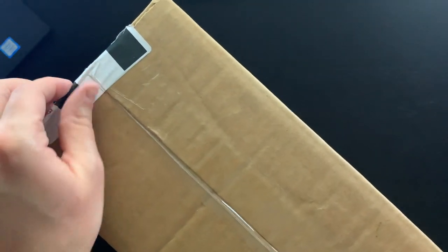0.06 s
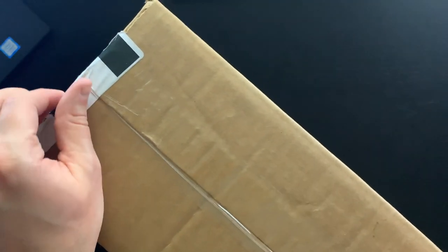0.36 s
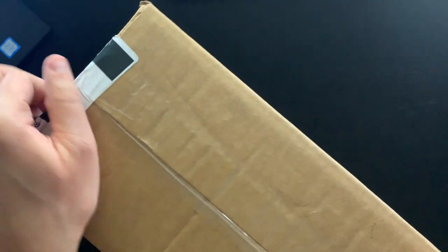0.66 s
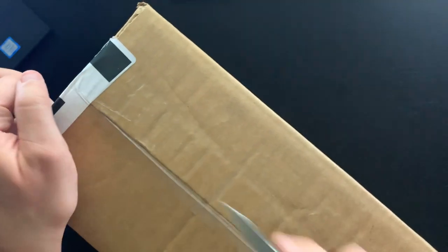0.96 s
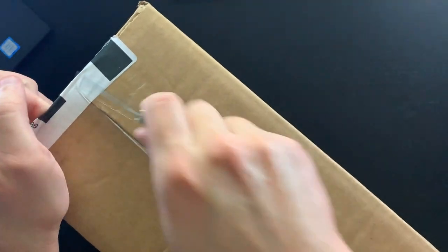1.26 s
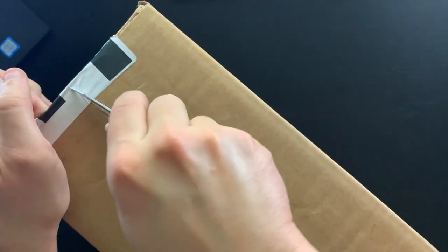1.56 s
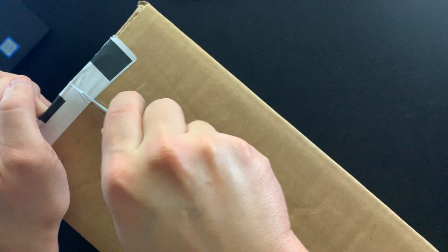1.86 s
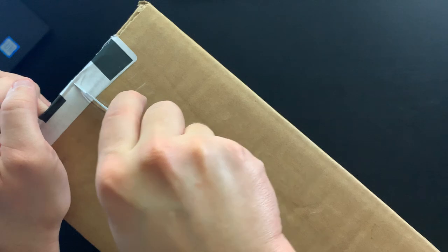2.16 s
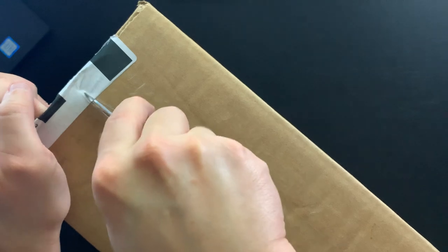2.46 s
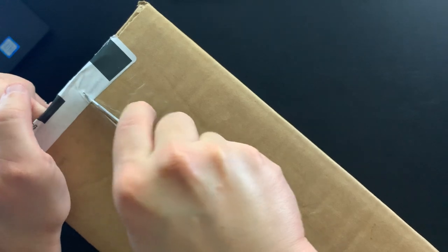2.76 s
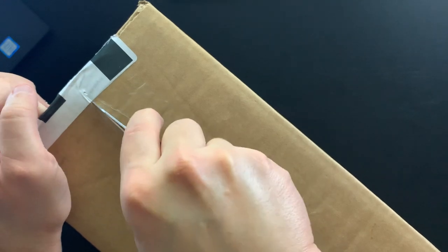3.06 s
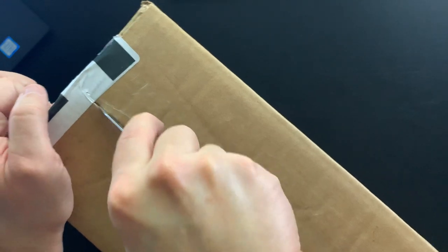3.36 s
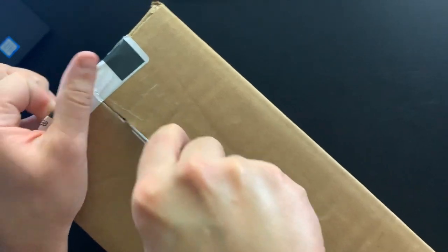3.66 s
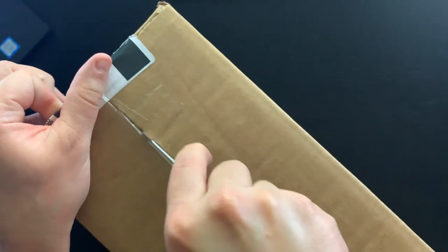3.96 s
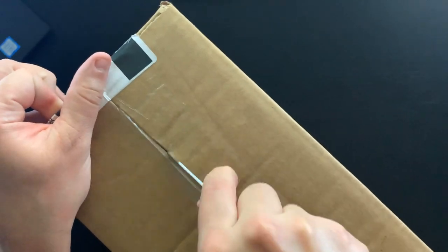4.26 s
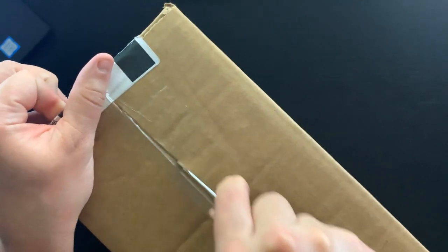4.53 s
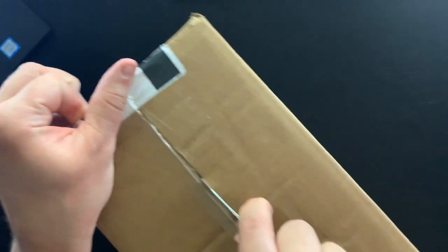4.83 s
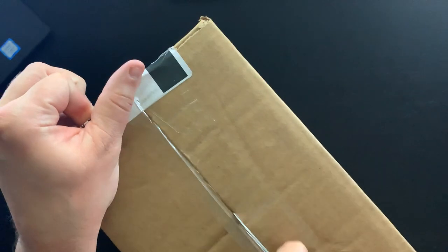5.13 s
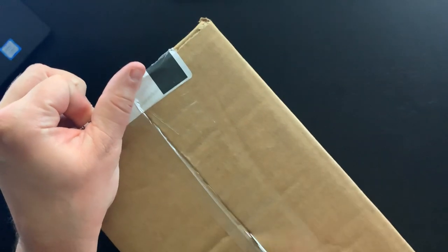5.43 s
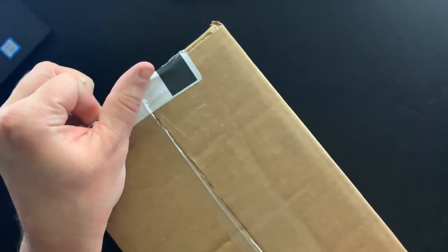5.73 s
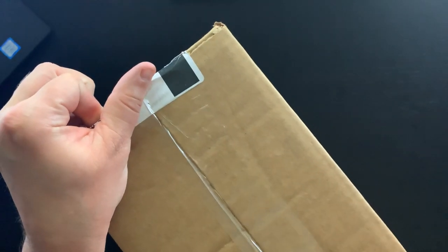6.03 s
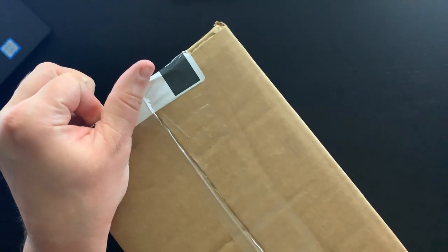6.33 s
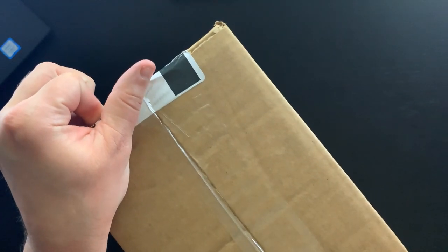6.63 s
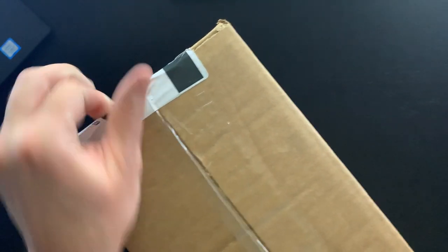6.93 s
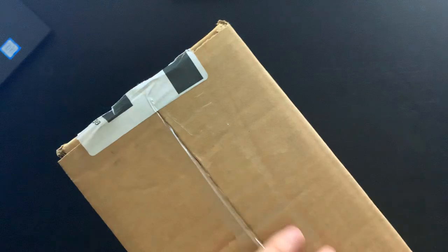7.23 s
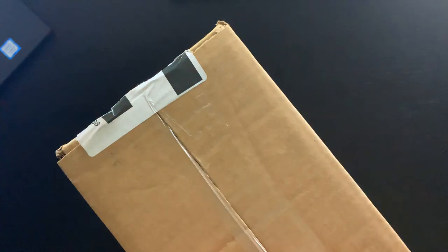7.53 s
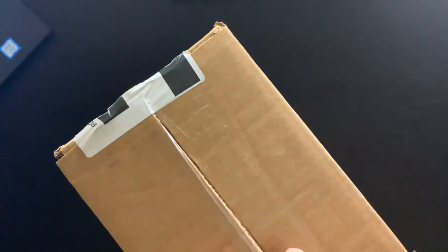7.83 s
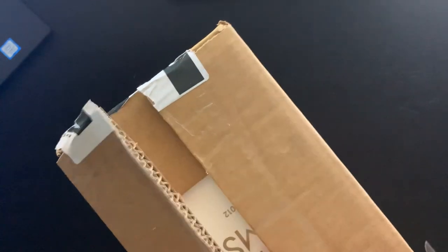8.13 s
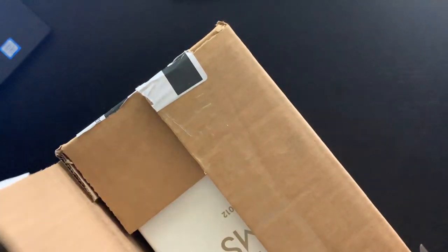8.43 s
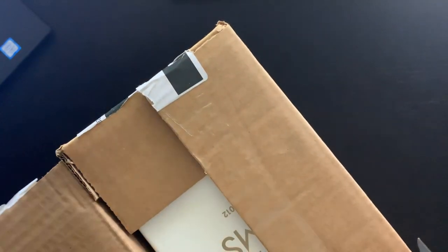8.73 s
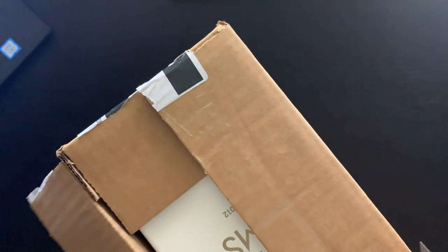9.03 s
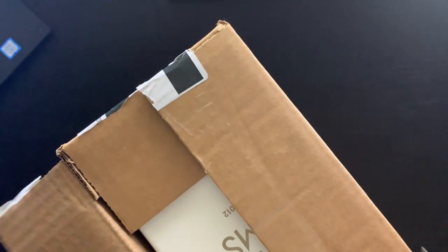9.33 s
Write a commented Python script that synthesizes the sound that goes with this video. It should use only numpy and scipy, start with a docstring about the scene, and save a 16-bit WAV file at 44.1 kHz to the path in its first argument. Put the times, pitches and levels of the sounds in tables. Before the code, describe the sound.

Hands shift a cardboard box with soft rubs and taps while a knife picks at the packing tape. The blade then slits the seam in a run of rasping, hissing strokes, catching with small pops. After a sharp knock, the last tape crackles and gives with a loud snap, and a flap rubs open with a faint creak. It is all heard close up in a small, quiet room.

```python
"""Opening a taped cardboard box

Close up, on a table in a small room. Hands shift the box; a knife picks at the packing tape, slits the
seam in several strokes and is laid down. The last tape crackles and snaps; a flap swings open, rubbing
on its fold. Rubbing is grainy noise through board resonances, cracks and knocks are noise bursts over
box modes, jolted panels are damped sines. Air rumbles on the microphone."""
import sys
import numpy as np
from scipy import signal
from scipy.fft import rfft, irfft
from scipy.io import wavfile

SR = 44100
rng = np.random.default_rng(int(sys.argv[2]) if len(sys.argv) > 2 else 0)


def dump_mix(stems):
    """Bounce the given channels to the path in sys.argv[1] as a 16-bit WAV at rate SR."""
    frames = np.atleast_2d(stems).T  # one column per channel
    limited = np.clip(frames, -1, 1)  # hard clip at full scale
    pcm = np.round(limited * 32767).astype(np.int16)
    wavfile.write(sys.argv[1], SR, pcm)


N = 414076
T = np.arange(N) / SR

# lid resonances under hand and blade: f/Hz, width/Hz, gain/dB
LID_RESONANCES = [(111, 17, -5), (178.5, 25, 6), (300, 31, 11), (494, 58, 9.5), (730, 300, 1.5),
                  (1960, 150, -10)]


def blade_strokes(drum_db=-6, drum_db_per_s=1.5):
    """Rows for rub(); drumming grows from the stiff corner towards the middle of the lid."""
    # start/s, end/s, rasp/dB, hiss re rasp/dB
    cuts = [(3.098, 3.207, -43, -10), (3.246, 3.376, -45, -13), (3.415, 3.419, -49, -12),
            (3.515, 3.606, -35.5, -9), (3.676, 3.944, -40.5, -11.5), (4.016, 4.032, -52, 1),
            (4.097, 4.166, -33.5, -7), (4.237, 4.26, -41, -5), (4.327, 4.442, -41.5, -7.5),
            (4.481, 4.536, -36, -4.5), (4.602, 4.818, -39.5, -5.5), (4.816, 5.152, -38, -7.5),
            (5.199, 5.281, -43, -9), (5.287, 5.443, -38, -7), (5.471, 5.56, -40, -5),
            (5.555, 5.992, -36, -4.5), (5.84, 6.378, -37.5, -2.5), (6.158, 6.588, -43.5, -1.5)]
    start, end, rasp, hiss = np.transpose(cuts)
    travel_s = (start + end) / 2 - start[0]
    return np.transpose([start, end, rasp, rasp + hiss, rasp + drum_db + drum_db_per_s * travel_s])


def blade():
    """The knife slits the tape along the seam."""
    # f/Hz, gain/dB
    spectrum = [(47, -25), (80, -3), (182, -5.5), (248, -15), (386, -8.5), (750, -11.5), (1170, -16),
                (1800, -8.5), (2430, -13.5), (3540, -11.5), (4140, -20), (4800, -14.5), (5640, -21),
                (9000, -21.5), (12500, -20), (16000, -32)]
    return rub(blade_strokes(), spectrum, LID_RESONANCES,
               grains_per_s=450, grain_db=-1, judder_db=1.3, snag_db=-5, singing=True)


def blade_jumps(cycles=1.94, ring_db=-19, chip_db=-15, chip_t60_s=0.027, size=6000):
    """The blade catches and jumps free: a short push, a chip of torn fibre, hand-damped ringing."""
    # t/s, level/dB, push f/Hz
    catches = [(3.085, -31, 900), (3.232, -28, 800), (3.576, -13.5, 1010), (4.954, -13, 657),
               (4.984, -15, 700), (5.018, -20, 380), (5.066, -11, 630), (5.4, -19, 506),
               (5.955, -20.5, 332), (6.082, -27, 298), (6.125, -25, 380)]
    out, t = np.zeros(N), np.arange(size) / SR
    for s, db, hz in catches:
        push = np.sin(2 * np.pi * hz * t) * fade(t, cycles / hz)
        chip = unit(band(rng.standard_normal(size), hz, 6000, order=1)) * fade(t, chip_t60_s)
        add(out, s, undb(db) * (push / push.max() + undb(ring_db) * box_ring(t) + undb(chip_db) * chip))
    return out


def tape_cracks(thud_db=-16):
    """Tape cracks as it is pierced, cut and pulled; the light film hardly moves the box."""
    # t/s, level/dB, snap re level/dB, film f/Hz
    breaks = [(.277, -36.5, -18, 4300), (0.333, -42.5, 5.5, 5500), (.459, -21.5, -8, 6000),
              (0.542, -37.5, 0.5, 4800), (.879, -41, -7, 5000), (1.053, -37, -11.5, 4970),
              (1.285, -38.5, -5.5, 4500), (2.427, -32.5, -0.5, 4480), (2.749, -59.5, -14, 6000),
              (3.593, -28.5, -9, 9000), (4.132, -22.5, -4, 9800), (4.526, -22.5, -12, 10000),
              (5.354, -36.5, 3, 11500), (5.803, -43.5, 12, 12500), (5.828, -36, 4, 12500),
              (5.879, -46, 10, 12000), (6.609, -22, -5.5, 13500), (6.671, -30.5, -1.5, 12500),
              (6.727, -47, 10, 14000), (7.311, -41, 1, 11000), (7.327, -27.5, 3, 9000),
              (7.332, -32.5, 2, 8800), (7.382, -33, -3.5, 10000), (7.497, -36, 4, 8500),
              (7.505, -28, 1, 7900), (7.511, -29.5, 6.5, 7900), (7.594, -27, 1.5, 6700),
              (7.642, -25.5, -4, 7550), (7.778, -48.5, 4, 13500), (7.822, -27, -3, 7100),
              (7.847, -37, 7.5, 11000), (7.856, -22.5, -1, 11000), (7.867, -19.5, -1.5, 9300),
              (7.952, -25, -8, 8000), (8.014, -18.5, -8, 4350), (8.084, -47.5, 8, 9500),
              (8.229, -43, 6.5, 10000), (8.522, -41, 6, 9950), (8.777, -56.5, 2.5, 9000),
              (8.834, -56.5, 7, 7000), (8.975, -44.5, 0, 10000), (9.0, -48, 2, 8000), (9.022, -51, 2, 8500),
              (9.085, -59, -3, 9000)]
    rows = [(s, db, thud_db, snap_db, hz) for s, db, snap_db, hz in breaks]
    return cracks(rows, hold_s=0.00094, crack_t60_s=0.017, snap_t60_s=0.015, strain_db=-20)


def knocks(snap_db=-8.5, snap_per_thud=-0.29, thud_trim_db=-0.5, film_hz=4860):
    """Knife and fingers knock on the board, the flap jumps free; the heavier the thud, the duller."""
    # t/s, level/dB, thud weight/dB
    blows = [(.649, -35, -4.5), (0.863, -41, 3), (.914, -32.5, -0.5), (0.945, -51, 17.5),
             (1.024, -41.5, -3), (1.276, -41.5, 10), (1.394, -43, 12), (1.517, -46, 3), (1.723, -40.5, 3),
             (1.858, -43.5, 10), (1.92, -52, 7), (2.043, -44, 2.5), (2.11, -44.5, 0), (2.392, -39, 6),
             (2.998, -52.5, 4), (3.084, -35.5, 5.5), (4.054, -45, 9.5), (6.582, -39.5, 7),
             (6.672, -41.5, 11), (6.729, -40, 4), (6.927, -17, -8), (6.936, -15.5, 1), (7.963, -9, 0.5),
             (7.971, -14.5, 2), (8.681, -49, 3)]
    rows = [(s, db, thud + thud_trim_db, snap_db + snap_per_thud * thud, film_hz)
            for s, db, thud in blows]
    return cracks(rows, hold_s=0, crack_t60_s=0.019, snap_t60_s=0.025, strain_db=-26.5)


def panel_booms(release_s=7.963, lag_cycles=1.44, rise_s=0.00046, size=12000):
    """Jolted panels and tape swing at their own pitch; the freed flap rings, its low modes last."""
    # t/s, level/dB, f/Hz, t60/cycles
    jolts = [(.459, -10, 1930, 19), (0.947, -26, 130, 3), (1.283, -26, 840, 9), (1.395, -25, 316, 11),
             (1.721, -33.5, 1095, 33), (1.858, -39, 318, 12), (3.576, -27, 114.4, 21),
             (3.578, -18.5, 312, 22), (4.132, -10.5, 315, 22), (4.669, -28.5, 304, 31),
             (6.609, -8.5, 670, 9), (6.928, -12, 742, 33), (6.928, -20, 2080, 25), (6.938, -21.5, 320, 31),
             (6.938, -22, 172, 17), (7.16, -29.5, 127, 5), (7.51, -28, 306, 17), (8.746, -39, 760, 8.5)]
    # f/Hz, level/dB, t60/s
    flap_modes = [(113.7, -12.5, 0.18), (149.4, -1, 0.052), (484, -8.5, 0.06), (559, -2, 0.045),
                  (786, -13, 0.056), (1120, -10, 0.04), (1436, 1.5, 0.011), (1834, -4, 0.023)]
    swings = [(s, db, hz, cycles / hz) for s, db, hz, cycles in jolts]
    swings += [(release_s + lag_cycles / hz, db, hz, t60_s) for hz, db, t60_s in flap_modes]
    out, t = np.zeros(N), np.arange(size) / SR
    attack = 1 - np.exp(-t / rise_s)
    for s, db, hz, t60_s in swings:
        add(out, s, undb(db) * np.sin(2 * np.pi * hz * t) * fade(t, t60_s) * attack)
    return out


def flap_strokes(drum_db=-6):
    """Rows for rub(); a lighter contact trades drumming for hiss."""
    # start/s, end/s, rasp/dB, lightness/dB
    slides = [(6.484, 6.796, -47, -3), (6.849, 6.915, -44, -4), (6.95, 7.105, -54.5, -11),
              (7.141, 7.27, -46, -1.5), (7.265, 7.44, -49, -6.5), (7.45, 7.786, -46.5, -4.5),
              (7.81, 7.957, -39, -2), (7.956, 8.1, -59, 0), (8.1, 8.218, -54.5, -2), (8.227, 8.427, -49, 8),
              (8.353, 8.652, -50, 3), (8.571, 9.105, -60, -2), (9.167, 9.459, -59, -2.5)]
    start, end, rasp, lightness = np.transpose(slides)
    return np.transpose([start, end, rasp, rasp + lightness, rasp + drum_db - lightness])


def flap():
    """Hands slide on the lid and the flap rubs on its fold."""
    # f/Hz, gain/dB
    spectrum = [(47, -38), (80, -15), (119, -9), (700, -13), (1170, -8.5), (3960, -14), (6500, -11.5),
                (11000, -5.5), (16000, -15.5)]
    # loose flap: f/Hz, width/Hz, gain/dB
    resonances = [(174, 30, 11), (486, 33, 13), (1150, 150, -5.5), (1840, 180, 6), (3250, 500, -1.5),
                  (4500, 450, -0.5)]
    return rub(flap_strokes(), spectrum, resonances,
               grains_per_s=500, grain_db=-6, judder_db=0.7, snag_db=-7)


def hand_strokes(hiss_db=-7.5):
    """Rows for rub(); the hiss of skin on board follows its rasp."""
    # start/s, end/s, rasp/dB, drumming/dB
    touches = [(0, 0.172, -56.5, -51), (0.17, 0.375, -52.5, -52), (0.426, 0.517, -49.5, -42.5),
               (0.523, 0.648, -48, -47.5), (0.7, 0.808, -49.5, -42.5), (0.796, 1.15, -64, -44),
               (1.32, 1.57, -63.5, -54), (2.118, 2.142, -48.5, -48), (2.252, 2.359, -53, -61),
               (2.389, 2.392, -40.5, -47), (2.41, 2.448, -50.5, -65), (2.646, 2.66, -59.5, -65)]
    start, end, rasp, drum = np.transpose(touches)
    return np.transpose([start, end, rasp, rasp + hiss_db, drum])


def hands():
    """Fingers rub the box and the knife tip probes the tape."""
    # f/Hz, gain/dB
    spectrum = [(47, -17), (109, 6.5), (174, 1), (212, 2), (296, -0.5), (718, -15.5), (1000, -16.5),
                (1900, -19), (3170, -21), (4900, -27.5), (13700, -32), (16000, -40)]
    return rub(hand_strokes(), spectrum, LID_RESONANCES,
               grains_per_s=500, grain_db=-5, judder_db=1.1, snag_db=-2, singing=True)


def rub(strokes, spectrum, resonances, grains_per_s, grain_db, judder_db, snag_db, singing=False):
    """Fibres catch and let go in dense clicks that the board colours; the contact judders."""
    start_s, end_s, rasp_db, hiss_db, drum_db = np.transpose(strokes)
    grains = (rng.random(N) < grains_per_s / SR) * rng.standard_normal(N)
    force = unit(undb(grain_db) * unit(grains) + rng.standard_normal(N))
    force *= undb(judder_db * (walk(45) + walk(220)))
    force *= 1 + undb(snag_db) * pulses(per_s=41, cap=2.5, t60_s=0.0039)  # snagged fibres
    # resonances wander about 2 % as the contact point moves
    ring = sum(undb(db) * resonate(force, hz * undb(0.16 * walk(4)), width_hz) / 2
               for hz, width_hz, db in resonances)
    sound = colour(force + ring + (sing(force) if singing else 0), spectrum)
    delay_s = 0.0007 * undb(4 * walk(5))  # reflection off the moving hand
    sound = sound + 0.48 * np.interp(T - delay_s, T, sound)
    rasp = unit(band(sound, 700, 5500)) * swell(start_s, end_s, rasp_db)
    flicker = undb(1.6 * walk(40))
    hiss = unit(band(sound, 5500, 17000) * flicker) * swell(start_s, end_s, hiss_db)
    corrugations = undb(5.6 * walk(35))
    drumming = unit(band(sound, 90, 700) * corrugations) * swell(start_s, end_s, drum_db)
    return rasp + hiss + drumming


def sing(force):
    """Rubbed tape and board resonate, gliding in pitch as the contact travels."""
    # start/s, end/s, first f/Hz, last f/Hz, gain/dB, Q
    glides = [(0.405, 0.838, 5200, 6170, 5.5, 1.7), (2.082, 2.172, 1700, 1470, 5, 2.6),
              (2.22, 2.35, 1250, 1900, 6, 2.4), (2.9, 3.603, 326, 329, 17, 10),
              (3.0, 3.95, 8100, 8400, 6.5, 11), (3.667, 3.96, 2720, 3350, -6, 2.7),
              (4.0, 4.865, 317, 306, 16.5, 11.5), (4.047, 4.8, 1590, 1360, 0, 2),
              (4.19, 4.606, 10300, 10100, 6, 16), (4.79, 5.594, 4900, 4370, -5, 22),
              (4.836, 5.556, 1670, 1710, 3.5, 16), (4.814, 5.15, 2220, 2240, 3, 20),
              (5.62, 5.92, 4600, 4850, -3, 5.9), (5.621, 5.98, 2940, 2700, -0.5, 7.2),
              (5.9, 6.492, 2600, 2120, 6.5, 11)]
    out = np.zeros(N)
    for start_s, end_s, first_hz, last_hz, db, q in glides:
        push = force[int(start_s * SR):int(end_s * SR)]
        along = np.linspace(0, 1, len(push))
        ring = resonate(push, first_hz + (last_hz - first_hz) * along, first_hz / q)
        add(out, start_s, undb(db) * ring * np.sqrt(np.abs(np.sin(np.pi * along))))
    return out


def cracks(rows, hold_s, crack_t60_s, snap_t60_s, strain_db, size=6000):
    """Strained fibres give, then break within milliseconds: a snap in the film, a thud in the box."""
    # f/Hz, gain/dB
    spectrum = [(47, -23.5), (80, -6.5), (194, 23), (316, 2.5), (431, 0), (718, -7.5), (1100, -9.5),
                (1850, -2), (2840, -11.5), (3400, -8), (4050, -11.5), (11200, -15.5), (16000, -21)]
    lead_s, strain_s, rise_s, thud_t60_s = 0.015, 0.0074, 0.000077, 0.045
    crack_db, film_ring_db, film_q = -0.5, 3.5, 3.9
    out, t = np.zeros(N), np.arange(size) / SR - lead_s
    age_s = np.maximum(t, 0)
    scale = np.sqrt(0.004 * SR / size)  # energy of 4 ms at rms 1
    attack = 1 - np.exp(-age_s / rise_s)
    strain = undb(strain_db) * np.exp(-np.abs(t) / strain_s)
    for s, db, thud_db, snap_db, film_hz in rows:
        noise = rng.standard_normal((3, size))
        pace = undb(2 * rng.standard_normal())
        decay_s = np.maximum(age_s * pace - hold_s, 0)
        crack = noise[0] * (strain + attack * fade(decay_s, crack_t60_s))
        crack = band(colour(crack, spectrum), 600, 4000)
        film = noise[1] * (strain + attack * fade(decay_s, snap_t60_s))
        film = band(colour(film, spectrum), 4000, 17000)
        film = film + undb(film_ring_db) * signal.lfilter(*signal.iirpeak(film_hz, film_q, SR), film)
        push = band(noise[2] * attack * fade(age_s, thud_t60_s), 190, 530, order=2)
        thud = unit(unit(push) + unit(box_ring(age_s) * attack))
        burst = undb(crack_db) * unit(crack) + undb(snap_db) * unit(film) + undb(thud_db) * thud
        add(out, s - lead_s, scale * undb(db) * burst)
    return out


def box_ring(t):
    """Box modes; each struck spot weights and detunes them differently."""
    # f/Hz, level/dB, t60/s
    modes = [(145.5, 8.5, 0.026), (193, -16.5, 0.11), (335, -2, 0.13), (382, -14.5, 0.013), (511, -2, 0.11),
             (647, -15.5, 0.033), (914, 3.5, 0.023)]
    ring = np.zeros(len(t))
    for hz, db, t60_s in modes:
        weight, detune = rng.standard_normal(2)
        tone = np.sign(detune) * np.sin(2 * np.pi * hz * (1 + 0.03 * detune) * t)
        ring += undb(db + 3 * weight) * tone * fade(t, t60_s)
    return ring


def tape_crinkle(trim_db=-0.5):
    """Loose tape ticks whenever the box is worked, louder with harder rubbing."""
    start_s, end_s, _, hiss_db, _ = np.vstack([hand_strokes(), blade_strokes(), flap_strokes()]).T
    ticks = pulses(per_s=32, cap=3, t60_s=0.006) * rng.standard_normal(N)
    return 2 * band(ticks, 5000, 16000, order=1) * swell(start_s, end_s, hiss_db + trim_db)


def fold_creak(start_s=8.36, end_s=9.27, level_db=-62):
    """The crease gives fibre by fibre in dry ticks as the flap bends back."""
    ticks = pulses(per_s=60, cap=2, t60_s=0.0072) * rng.standard_normal(N)
    return unit(band(ticks, 2500, 13000, order=1)) * swell([start_s], [end_s], [level_db])


def whistle(end_s=0.41, first_hz=1350, last_hz=1260, level_db=-63):
    """A faint tone sinks and wavers as the box is first shifted."""
    hz = np.interp(T, [0, end_s], [first_hz, last_hz]) * (1 + 0.006 * walk(46))
    envelope = undb(level_db + 3 * walk(20)) * np.clip((end_s - T) / 0.013, 0, 1)
    return np.sin(2 * np.pi * np.cumsum(hz) / SR) * envelope


def room(x, wet_db, low_t60_s=0.29, treble_t60_s=0.31, treble_db=-4, build_s=0.004, size=22000):
    """Near walls add a short dense tail."""
    t = np.arange(size) / SR
    low = band(rng.standard_normal(size), 90, 3500, order=1) * fade(t, low_t60_s)
    treble = band(rng.standard_normal(size), 3500, 16000, order=1) * fade(t, treble_t60_s)
    tail = (low + undb(treble_db) * treble) * np.clip(t / build_s - 0.5, 0, 1)
    mid_gain = np.sqrt(np.sum(band(tail, 500, 3000) ** 2) * SR / 5000)
    return x + undb(wet_db) * signal.fftconvolve(x, tail / mid_gain)[:N]


def air(room_db=-54.5, rumble_db=-9, sway_db=8):
    """Faint room noise, plus slow pressure swings as the hands stir the air."""
    # room noise: f/Hz, gain/dB
    spectrum = [(24, 3), (40, 0), (66, -11), (150, -16.5), (450, -20), (2000, -36), (8000, -41.5),
                (16000, -47.5)]
    # air over the microphone: t/s, level/dB
    draught = [(0, -51), (.81, -36), (1.83, -48), (2.35, -39.5), (2.9, -45), (3.5, -35), (4.39, -30.5),
               (4.81, -39.5), (7.82, -45.5), (7.97, -35.5), (8.24, -49), (9.39, -43)]
    still = unit(colour(rng.standard_normal(N), spectrum)) * undb(room_db)
    rumble = unit(band(rng.standard_normal(N), 18.4, 40)) * undb(rumble_db)
    sway = unit(band(rng.standard_normal(N), 3.3, 8.6, order=2)) * undb(sway_db)
    return still + (rumble + sway) * undb(np.interp(T, *np.transpose(draught)))


def swell(starts_s, ends_s, levels_db, ease_s=0.021):
    """Strokes speed up and slow down as half sines; overlaps add in power."""
    power = np.zeros(N)
    for start_s, end_s, db in zip(starts_s, ends_s, levels_db):
        size = max(int((end_s - start_s + 2 * ease_s) * SR), 2)
        speed = np.sin(np.linspace(0, np.pi, size))
        add(power, start_s - ease_s, (undb(db) * speed) ** 2)
    return np.sqrt(power)


def pulses(per_s, cap, t60_s):
    """Decaying pulses of random time and height."""
    kicks = (rng.random(N) < per_s / SR) * np.minimum(rng.exponential(size=N), cap)
    return signal.lfilter([1], [1, -fade(1 / SR, t60_s)], kicks)


def resonate(force, hz, width_hz):
    """Resonance whose centre follows the curve hz."""
    carrier = np.exp(2j * np.pi * np.cumsum(hz) / SR)
    pole = np.exp(-np.pi * width_hz / SR)
    return 2 * np.real(carrier * signal.lfilter([1 - pole], [1, -pole], force / carrier))


def colour(x, spectrum, size=4096):
    """Minimum-phase filter through (f/Hz, gain/dB) points."""
    hz, db = np.transpose(spectrum)
    bins_hz = np.arange(size // 2 + 1) * SR / size
    gain = undb(np.interp(np.log(bins_hz + 1), np.log(hz), db))
    cepstrum = irfft(np.log(gain))
    cepstrum[1:size // 2] *= 2
    cepstrum[size // 2 + 1:] = 0
    return signal.fftconvolve(x, irfft(np.exp(rfft(cepstrum))))[:len(x)]


def band(x, lo_hz, hi_hz, order=3):
    """Butterworth band-pass."""
    return signal.sosfilt(signal.butter(order, [lo_hz, hi_hz], "band", fs=SR, output="sos"), x)


def walk(per_s):
    """Random curve with a spread near 1."""
    knots = rng.standard_normal(N // 40)
    return np.interp(T * per_s, np.arange(len(knots)), knots)


def fade(t, t60_s):
    """Exponential decay."""
    return np.exp(-np.log(1000) * t / t60_s)


def add(out, start_s, sound):
    """Mix in place."""
    i = max(int(start_s * SR), 0)
    out[i:i + len(sound)] += sound[:N - i]


def undb(db):
    """Decibels to gain."""
    return 10 ** (np.asarray(db) / 20)


def unit(x):
    """Scale to rms 1."""
    return x / np.sqrt(np.mean(x ** 2) + 1e-20)


def scene():
    """Handling, slitting and opening in the room; mono."""
    rubbing = hands() + blade() + flap() + tape_crinkle() + fold_creak() + whistle()
    knocking = knocks()
    mix = room(rubbing + tape_cracks(), wet_db=-7)
    mix += room(knocking + blade_jumps(), wet_db=-8)
    mix += room(panel_booms(), wet_db=-9)
    return (mix + air())[None]


def record(dry, top_hz=16000):
    """Soft overload on the loudest snap, then a steep low-pass."""
    return signal.sosfilt(signal.ellip(8, 0.2, 70, top_hz, fs=SR, output="sos"), np.tanh(dry))


dry = scene()
out = record(dry)
dump_mix(out)
```